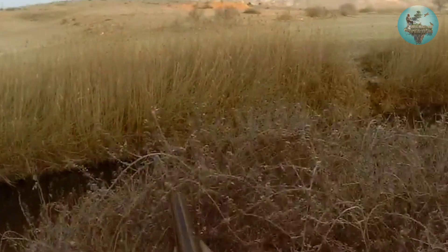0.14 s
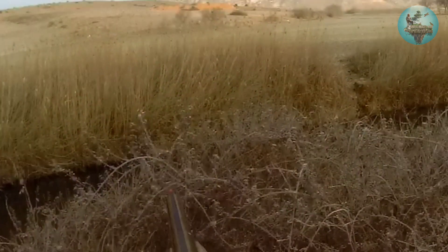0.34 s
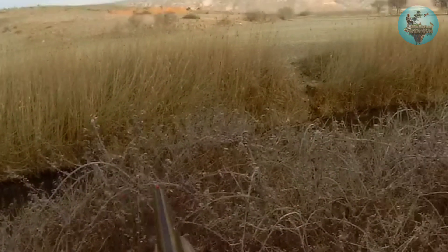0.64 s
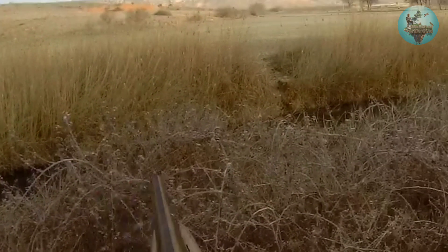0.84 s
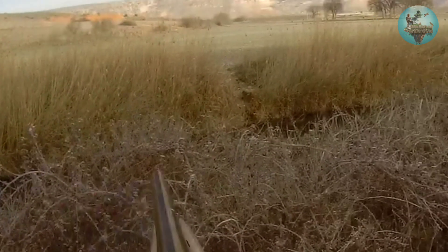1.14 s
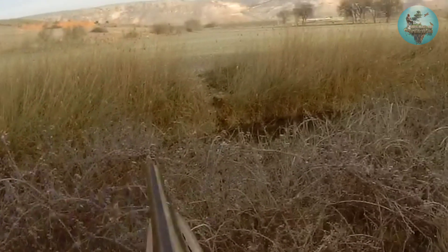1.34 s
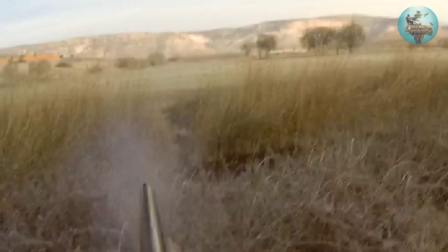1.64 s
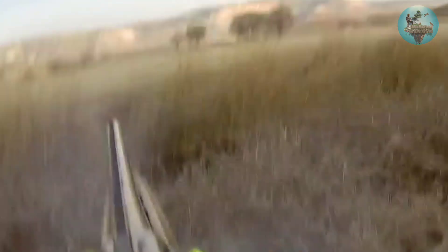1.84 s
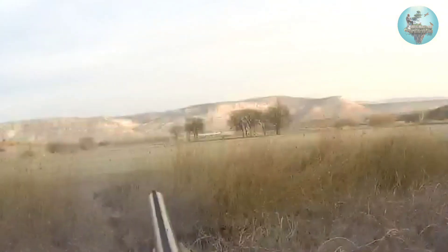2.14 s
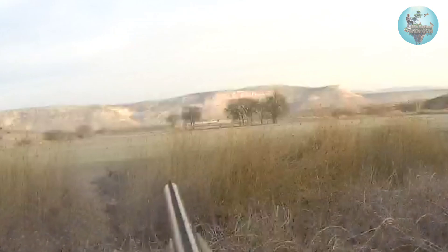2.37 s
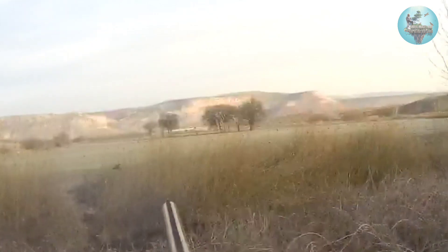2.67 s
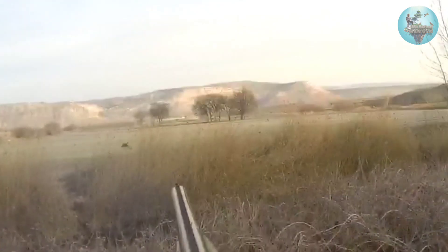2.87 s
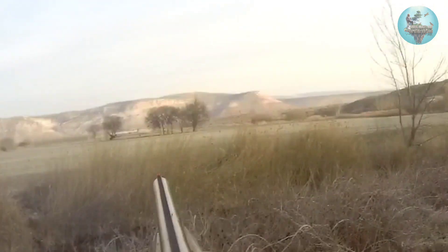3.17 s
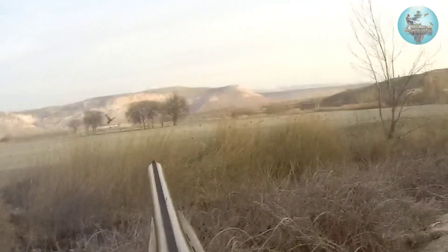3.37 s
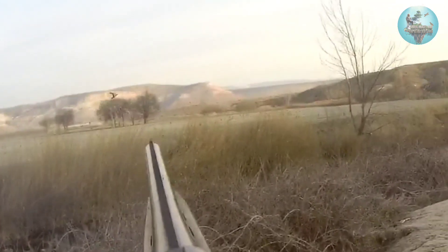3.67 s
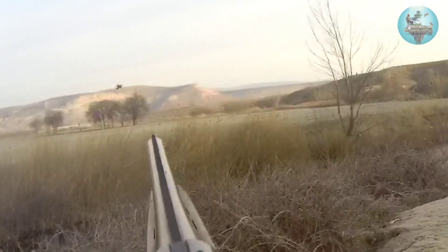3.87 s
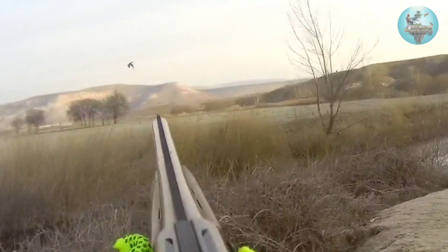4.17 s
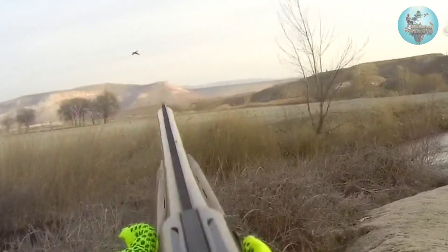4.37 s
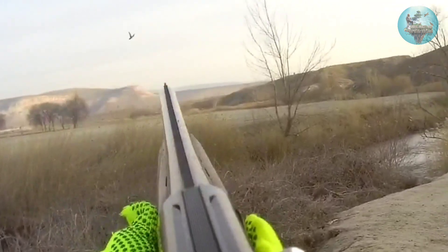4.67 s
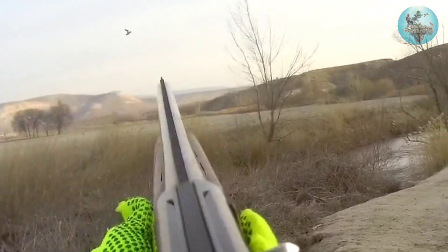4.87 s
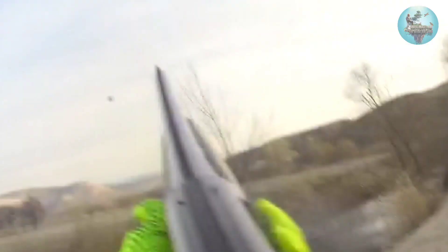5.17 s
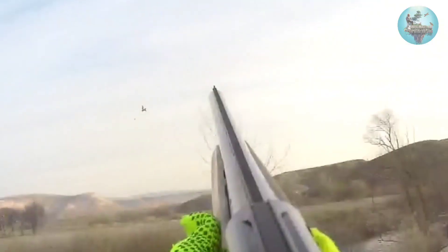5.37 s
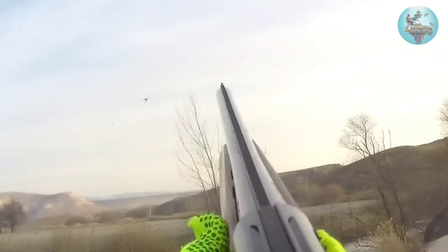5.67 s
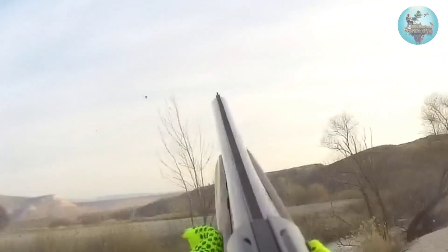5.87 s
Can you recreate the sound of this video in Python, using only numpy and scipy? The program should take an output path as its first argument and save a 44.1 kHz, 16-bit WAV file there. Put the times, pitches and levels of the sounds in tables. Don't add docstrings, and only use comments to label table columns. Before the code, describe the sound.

Two overloaded shotgun blasts over open reedy fields, slowed down, each rolling into long dull echoes with bank slaps and brief tree crackles.

```python
import sys
import numpy as np
from scipy import signal
from scipy.fft import rfft, irfft
from scipy.io import wavfile

SR = 44100
rng = np.random.default_rng(int(sys.argv[2]) if len(sys.argv) > 2 else 0)


def invert_db(level):
    return 10 ** (np.asarray(level, dtype=float) / 20)


def wav_out(sig):
    wavfile.write(sys.argv[1], SR, np.round(np.clip(np.atleast_2d(sig).T, -1, 1) * 32767).astype(np.int16))


N = 265482
T = np.arange(N) / SR


def at_hz(points, hz):
    table_hz, table_db = np.transpose(points)
    return np.interp(np.log(hz), np.log(table_hz), table_db)


def rms_one(x):
    return x / np.sqrt(np.mean(x ** 2) + 1e-20)


def drift(rate_hz):
    r = np.exp(-2 * np.pi * rate_hz / SR)
    settle = 9000
    noise = rng.standard_normal(N + settle)
    return rms_one(signal.lfilter([1], [1, -2 * r, r * r], noise)[settle:])


def colour(x, spectrum):
    size = 2 ** 14
    hz = np.maximum(np.fft.rfftfreq(size, 1 / SR), 1)
    ends = [(0.61, -44.5)] + list(spectrum) + [(SR / 2, -80)]
    cepstrum = irfft(np.log(invert_db(at_hz(ends, hz))))
    cepstrum[1:size // 2] *= 2
    cepstrum[size // 2 + 1:] = 0
    response = irfft(np.exp(rfft(cepstrum)))
    return rms_one(signal.oaconvolve(x, response)[:N])


def scatter(per_s, spread_db):
    sizes = invert_db(spread_db * np.minimum(rng.exponential(1, N), 4)) * rng.choice([-1, 1], N)
    return sizes * (rng.random(N) < per_s / SR)


def swell(t, level_db, rise_s, t60_s):
    return invert_db(level_db - 60 * np.where(t < 0, -t / rise_s, t / t60_s))


# start_s, rate_hz (stored samples per second)
PLAYBACK = [
    (0, 13600),
    (1.4, 15050),
    (4.8, 18200),
    (6.02, 19200),
]


def speed(s):
    seconds, rate_hz = np.transpose(PLAYBACK)
    return np.interp(s, seconds, rate_hz) / np.interp(SHOTS[0][0], seconds, rate_hz)


# start_s, suction_s (how long the air pulls back), suction_depth
SHOTS = [
    (1.3300, .058, 1.6),
    (4.7740, .047, 1.6),
]
JET_DB = [
    -2,
    2,
]
# after_blast_s, level_db, rise_s, t60_s
PUFFS = [
    (-.019, -55.5, .012, .045),
    (-.006, -27.5, .005, .09),
    (.005, -1, .024, .016),
    (.047, -9, .065, 0.067),
]
# start_s, width_ms, height, count (pushes in the run)
FRONTS = [(1.3250, .8, .4, 1), (1.3268, 1.5, -.4, 1), (4.7670, .6, .3, 1), (4.7687, .8, -.4, 1),
          (1.3315, .7, 1.6, 4), (1.3400, 2.1, 12, 1), (1.3443, .2, 1.5, 1), (1.3592, 1.5, 12, 1),
          (1.3643, 1.1, 1.8, 1), (1.3693, .4, .9, 2), (1.3759, .9, 1.5, 3), (1.3830, 2.6, .6, 1),
          (1.3890, 2.4, 1.0, 1), (1.3968, 2.5, .5, 1), (4.7734, .9, .55, 1), (4.7760, 1.0, 1.9, 1),
          (4.7789, 1.1, 12, 1), (4.7974, .7, 2.6, 1), (4.7983, .5, 1.3, 1), (4.8075, 1.6, 1.5, 1),
          (4.8120, 2.0, .75, 1), (4.8148, .9, 1.5, 3), (4.8248, 2.8, .5, 1)]
# pitch_hz, level_db (per Hz)
GAS = [(100, -12), (300, 0.5), (700, -2.5), (1500, -5), (3000, -11), (6500, -21.5)]


def blasts():
    out = np.zeros(N)
    gas = colour(scatter(6000, 2.0), GAS)
    for (start_s, suction_s, depth), jet_db in zip(SHOTS, JET_DB):
        phase = np.clip((T - start_s) / suction_s, 0, 1)
        out -= depth * np.sin(np.pi * phase ** 0.91) ** 0.66 * (phase < 1)
        since = (T - start_s) * speed(start_s)
        roar = sum(swell(since - after_s, *shape) for after_s, *shape in PUFFS)
        out += gas * invert_db(jet_db) * roar
    for first_s, width_ms, height, count in FRONTS:
        spacing_s = 0.002 / speed(first_s)
        for s in first_s + np.arange(count) * spacing_s:
            near = slice(round(s * SR) - 400, round(s * SR) + 400)
            distance = np.abs(T[near] - s) / (width_ms / 2000 + 0.0001)
            out[near] += height * np.exp(-distance ** 2.6)
    return out


# crest_s, level_db, rise_s, t60_s, brightness_db (added per higher layer)
RETURNS = [
    [(1.385, -12.5, .1, 0.22, -2), (1.45, -20, .3, 0.37, 2), (1.55, -27, .15, 0.29, 0.3),
     (1.70, -31, 0.73, 0.5, 0.8), (1.805, -24.5, .12, 0.77, -0.5), (1.92, -34.5, .3, .6, 4.5),
     (2.17, -38.5, .7, 0.49, 0.6), (2.335, -50.5, .3, 0.98, 4), (2.60, -64, .9, 2, 9.5),
     (2.84, -68, .3, 0.73, 10), (3.07, -65.5, .8, 2.5, 17.5), (3.45, -74, 1.2, 5.0, 1),
     (4.40, -68.5, .8, 1.1, -0.5), (4.72, -64.5, .5, .5, -4.5)],
    [(4.822, -13.5, .1, 0.17, -4.5), (4.86, -24.5, .2, 0.64, 2.5), (5.04, -36, .3, 0.33, 0.6),
     (5.155, -29, .1, 0.57, 0), (5.24, -32.5, 0.42, 0.93, 0.5), (5.43, -36.5, .7, 0.56, -8),
     (5.605, -39, .25, 0.39, -6), (5.85, -54.5, .9, 1.5, 2.5), (6.018, -47, .06, .3, -0.5)],
]
# crest_s, level_db, rise_s, t60_s
THUNDER = [
    [(1.385, -11.5, .1, 0.26), (1.45, -17, .3, 0.43), (1.80, -26, 0.35, 1.07), (2.20, -42.5, 1.2, 1.17),
     (2.80, -62, 1.7, 1.5), (3.35, -61.5, 1.3, 4.5)],
    [(4.822, -13, .1, 0.16), (4.86, -25.5, .2, .8), (5.16, -32, .2, 1.13), (5.45, -38.5, 0.65, .8),
     (5.85, -59, 1.5, 2.5)],
]
# level_db, air_loss_db (per second of path), t60_share
LAYERS = [
    (0.5, 0.75, 0.97),
    (-11, 7, 1.2),
    (-13.5, 19, .85),
]
# pitch_hz, level_db (per Hz)
RUMBLE = [(16, -10), (35, -1), (110, -0.5), (170, -4.5), (260, -28.5)]
BODY = [(110, -28), (170, 6.5), (260, 2), (420, -2.5), (700, -11.5), (1000, -37.5)]
WASH = [(480, -31.5), (700, 1), (1000, 3), (1500, -5.5), (2200, -13), (3100, -29.5)]
RUSTLE = [(1400, -28), (1900, 0), (2500, -1), (2900, -4), (3200, -13), (4000, -30)]
SHEEN = [(2300, -21), (2950, 2.5), (3800, -3.5), (4600, -6), (5500, -10.5)]


def roll_levels(t, path_s, returns, thunder):
    power = sum(swell(t - crest_s, *shape) ** 2 for crest_s, *shape in thunder)
    levels = [np.sqrt(power)]
    for k, (layer_db, air_loss_db, t60_share) in enumerate(LAYERS):
        power = 0
        for crest_s, level_db, rise_s, t60_s, brightness_db in returns:
            crest_db = level_db + brightness_db * k
            power = power + swell(t - crest_s, crest_db, rise_s, t60_s * t60_share) ** 2
        levels.append(invert_db(layer_db - air_loss_db * path_s) * np.sqrt(power))
    levels.append(levels[-1] * invert_db(-4 - 12.5 * path_s))
    return levels


def roll():
    out = np.zeros(N)
    lumps = drift(28)
    arrivals = [scatter(9000, 1.2), scatter(9000, 2.2)]
    layers = [(RUMBLE, 1.2), (BODY, 1.5), (WASH, 1.2), (RUSTLE, 1.0), (SHEEN, 1.1)]   # tone, lumps in dB
    for (fired_s, *_), returns, thunder in zip(SHOTS, RETURNS, THUNDER):
        start_s = returns[0][0]
        t = T[round(start_s * SR):]
        fade_in = np.clip((t - start_s) / 0.014, 0, 1)
        levels = roll_levels(t, t - fired_s, returns, thunder)
        for k, (spectrum, lumpy_db) in enumerate(layers):
            shifted = [(hz * speed(fired_s), level_db) for hz, level_db in spectrum]
            echoes = rms_one(colour(arrivals[k % 2], shifted) * invert_db(lumpy_db * lumps))
            out[-len(t):] += fade_in * levels[k] * echoes[-len(t):]
    return out


# pitch_hz, level_db (per Hz)
HILL_COLOUR = [(71, -28.5), (120, -14.5), (252, -0.5), (290, 0), (554, -16.5), (1190, -22.5), (1780, -39),
               (4400, -110)]


def hills():
    crest_s, level_db, rise_s, sag_db_per_s = 3.224, -57, 0.49, 7
    end_s, end_t60_s = 4.175, 0.53
    murmur = swell(T - crest_s, level_db, rise_s, 60 / sag_db_per_s)
    ending_db = -60 * np.maximum(T - end_s, 0) / end_t60_s
    level = murmur * invert_db(ending_db + 1.0 * drift(8))
    return level * colour(scatter(5000, 1.8), HILL_COLOUR)


# start_s, width_ms, level_db
SLAPS = [
    (1.794, 5.74, -5),
    (2.3310, 4.5, -32.5),
    (2.841, 3.3, -50),
    (3.403, 4.2, -43),
    (5.1560, 8.4, -15.5),
    (5.2020, 2.07, -18.5),
    (5.442, 3.7, -21.5),
    (5.602, 3.8, -26),
]


def slaps():
    out = np.zeros(N)
    for start_s, width_ms, level_db in SLAPS:
        u = (T - start_s) / (width_ms / 1000)
        push = np.exp(-((u - .1) / .3) ** 2)
        pull = np.exp(-((u - .75) / .17) ** 2)
        rebound = np.exp(-((u - 1.05) / .15) ** 2)
        out += invert_db(level_db) * (.55 * push - pull + .3 * rebound)
    return out


# start_s, level_db, t60_s
CRACKLES = [
    (1.6057, -22.5, 0.033),
    (1.6785, -24.5, 0.038),
    (1.685, -21.5, 0.081),
    (1.699, -22.5, 0.064),
    (1.779, -35.5, 0.065),
    (1.79, -35, 0.15),
    (1.903, -35.5, 0.23),
    (5.052, -17, 0.089),
    (5.066, -32.5, 0.046),
    (5.1993, -23.5, 0.023),
]
# pitch_hz, level_db (per Hz)
CRACKLE = [(150, -12), (400, 11), (1000, 0.5), (2500, -4.5), (4000, -12.5), (6500, -21)]


def crackles():
    level = np.zeros(N)
    for start_s, level_db, t60_s in CRACKLES:
        fade_in = np.clip((T - start_s) / 0.0036, 0, 1)
        level += invert_db(level_db - 60 * np.abs(T - start_s) / t60_s) * fade_in
    return level * colour(scatter(2500, 1.74), CRACKLE)


# pitch_hz, level_db (per Hz)
BREEZE = [(14, 2), (30, 2.5), (60, -3), (110, -6.5), (240, -8), (400, -18.5)]


def breeze():
    return invert_db(-75 + 1.0 * drift(6.9)) * colour(rng.standard_normal(N), BREEZE)


# pitch_hz, level_db (per Hz)
HISS = [(100, -8.5), (240, 1), (450, -1), (1500, -5.5), (4200, -5), (6500, -4)]


def hiss():
    return invert_db(-73) * colour(rng.standard_normal(N), HISS)


def scene():
    background = hiss() + breeze()
    return (blasts() + roll() + hills() + slaps() + crackles() + background)[None]


def slow_down(x):
    place = np.cumsum(np.interp(T, *np.transpose(PLAYBACK))) / SR
    fine = np.interp(np.arange(0, place[-1] + 1, 1 / 4), place, x)
    band_top = signal.cheby2(15, 40, .362, fs=4, output="sos")
    stored = signal.sosfiltfilt(band_top, fine)[::4]
    return np.interp(place, np.arange(len(stored)), stored)


def top_cut(x):
    return signal.sosfilt(signal.butter(12, 16450, fs=SR, output="sos"), x)


def record(dry):
    preamp_rail, converter_rail, offset = 1.0, .715, -0.009
    coupling_s, top_hz, rounding_db = .22, 15800, -98
    x = np.clip(dry[0], -preamp_rail, preamp_rail)
    r = np.exp(-1 / (coupling_s * SR))
    x = signal.lfilter([1, -1], [1, -r], x) + offset
    x = np.clip(x, -converter_rail, converter_rail)
    x = slow_down(x) + invert_db(rounding_db) * rng.standard_normal(N)
    x = signal.sosfilt(signal.cheby2(14, 50, top_hz, fs=SR, output="sos"), x)
    return top_cut(x[None])


dry = scene()
out = record(dry)
wav_out(out)
```